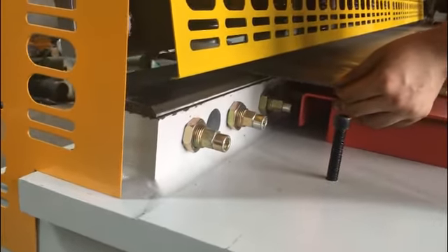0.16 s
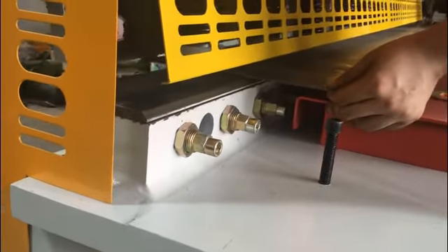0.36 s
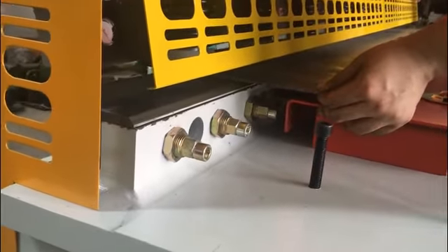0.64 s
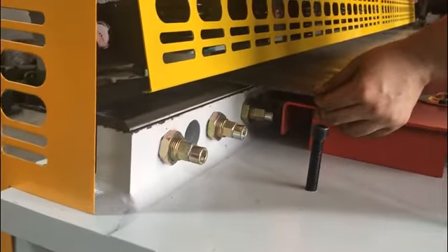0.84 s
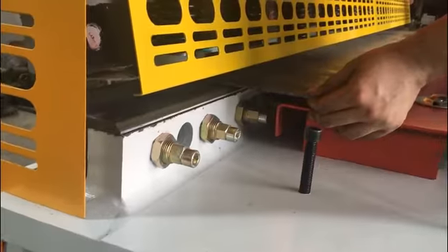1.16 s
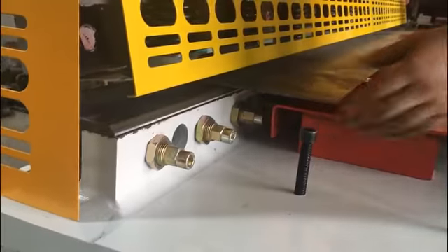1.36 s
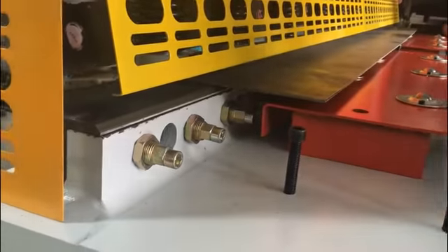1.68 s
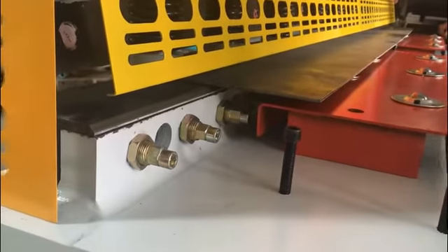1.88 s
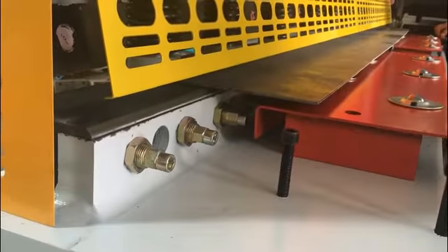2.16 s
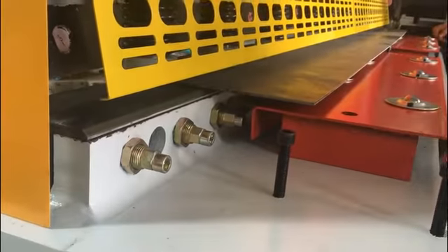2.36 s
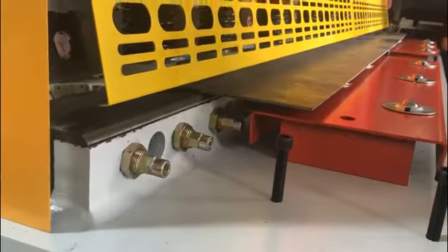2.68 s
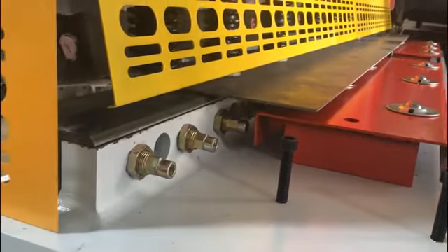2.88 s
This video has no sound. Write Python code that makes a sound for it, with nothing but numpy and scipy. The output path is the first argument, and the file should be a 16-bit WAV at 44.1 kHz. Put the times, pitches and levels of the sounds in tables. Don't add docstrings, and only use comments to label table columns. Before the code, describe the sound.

A hydraulic sheet-metal shear idles with a steady low pump hum, throbbing rapidly, with faint whine, hiss and small metallic rattles. Around 1.7 seconds a valve opens: oil rushes and rumbles, shaking the frame while loose parts chink. A sharper rattle comes at 2.6, then the pump strains louder. A dry relay click at 2.8 precedes clamps slamming in quick succession from 2.98, very loud, the steel ringing. Near mono.

```python
import sys
import numpy as np
from scipy import signal
from scipy.fft import rfft, irfft, next_fast_len
from scipy.io import wavfile
from scipy.ndimage import uniform_filter1d, map_coordinates

SR = 44100
rng = np.random.default_rng(int(sys.argv[2]) if len(sys.argv) > 2 else 0)


def dump_mix(stems):
    frames = np.atleast_2d(stems).T
    limited = np.clip(frames, -1, 1)
    pcm = np.round(limited * 32767).astype(np.int16)
    wavfile.write(sys.argv[1], SR, pcm)


def invert_db(level):
    return 10 ** (np.asarray(level, dtype=float) / 20)


N = 133623

SHAFT_HZ, ECCENTRIC_S = 24.937, 0.01082
# multiple of the shaft rate, rms level in dB, unsteadiness in dB, growth with pressure in dB per dB.
SHAFT_ORDERS = [(4, -40, -1, .5), (11, -44.5, 2, .3), (12, -32, 0, .9), (13, -29.5, 0.8, .8),
                (14, -42.5, -2, 1.1), (25, -42.5, 0, .3), (26, -30.5, -1, 1.37), (27, -45, 1.3, 1.6)]
MOST_UNSTEADY_DB = 1.3
# time in seconds, level in dB.
PRESSURE = [
    (0, 0.5),
    (.2, 0.74),
    (1.7, 0.1),
    (2.0, -1),
    (2.62, -0.1),
    (2.75, 4),
    (3.03, 6),
]
# frequency in Hz, rms level in dB.
WHINE = [(1222, -48.5), (1394, -49), (1480, -65), (1572, -60.5), (1620, -60), (1696, -55.5), (1744, -64),
         (1922, -52.5), (2116, -56.5), (2180, -57.5), (2449, -65.5), (2536, -62), (3494, -61.5)]
WHINE_DB, WHINE_UNSTEADY_DB = 0.5, 1.25
SHELL_HZ, SHELL_WIDTH_HZ = 661, 24
CASING_DB, IDLE_DB, HISS_DB = -33, -30.5, -39
# frequency in Hz, width in Hz, level in dB.
CASING = [(600, 38, -15), (679, 9, 5), (502.7, 17, -7.5), (789, 98, -9), (419.7, 26.5, -8.5)]
# frequency in Hz, density in dB per Hz.
IDLE = [(13, -45), (32, -3), (81, 2.5), (225, -9.5), (312, -2.5), (462, -14), (652, -4), (731, -5),
        (1100, -39.5), (1430, -56), (2420, -120)]
# frequency in Hz, density in dB per Hz.
HISS = [(530, -29), (900, 2.5), (1090, -7.5), (1330, -6), (1500, -7), (3620, -18), (7500, -32.5),
        (9750, -70), (16500, -120)]
# time in seconds, level in dB.
HISS_SETTLES = [(0, 2), (.18, 2.5), (.3, -0.46)]
# frequency in Hz, gain in dB.
AIR = [(4500, 1.5), (4780, 2), (4950, -6), (5150, 2.5), (5500, 5.5), (7500, 4.5), (10000, -0.5),
       (16000, -27)]

# time in seconds, level in dB.
RATTLES = [(.01, -46), (.07, -45), (.13, -43), (.16, -45), (.31, -48), (.42, -49), (.63, -48), (.96, -47),
           (1.07, -44), (1.1, -46), (1.25, -48), (1.695, -41), (1.885, -41), (1.965, -41), (2.06, -44),
           (2.095, -41), (2.165, -42), (2.29, -42), (2.42, -42), (2.455, -41), (2.545, -42), (2.608, -34),
           (2.632, -36), (2.76, -43)]
# frequency in Hz, density in dB per Hz.
RATTLE_COLOUR = [(2000, -30), (4300, -4), (6000, -4), (9000, -3), (12500, -3), (14000, -8), (15700, -5)]
RATTLE_DB, RATTLE_PATCHY_DB, RATTLE_T60, RATTLE_RISE_S = -4, 2.5, 0.11, 0.008
# time in seconds,
# level in dB, resonance in Hz.
CHINKS = [(.13, -55, 11200), (.13, -57, 12800), (.305, -57, 8600), (.625, -57, 8600), (.985, -57, 9300),
          (1.07, -54, 11500), (1.075, -57, 9800), (1.245, -57, 8600), (1.69, -53, 11700),
          (1.69, -56, 13000), (1.695, -46, 6200), (1.735, -46, 6300), (1.79, -48, 5800), (1.78, -53, 10000),
          (1.88, -50, 12300), (1.88, -53, 10800), (1.965, -55, 12800), (2.055, -53, 12300),
          (2.095, -52, 12200), (2.16, -56, 13000), (2.175, -55, 11700), (2.285, -53, 11400),
          (2.415, -51, 12400), (2.54, -53, 11400), (1.965, -53, 10800), (2.455, -55, 13000),
          (2.604, -40, 15600), (2.607, -38, 4700), (2.753, -48, 12800)]
CHINK_WIDTH_HZ, CHINK_T60 = 700, 0.13

# time in seconds, level in dB.
FLOW = [
    (1.66, -34),
    (1.71, -2.5),
    (1.8, -1),
    (2.1, 0),
    (2.45, 0),
    (2.7, -1),
    (2.9, -1.5),
    (3.03, -2),
]
RUSH_DB, RUMBLE_DB, FRAME_DB = -31, -24.5, -34
RUMBLE_GROWS = 2.1
# frequency in Hz, density in dB per Hz.
RUSH = [(470, -32), (800, 0), (1610, 1), (2780, -10), (4040, -13), (4970, -19.5), (6050, -21.5),
        (7500, -28.5), (9750, -57), (16500, -120)]
# frequency in Hz, density in dB per Hz.
RUMBLE = [(15, -31), (25, -27), (57, -0.5), (136, -2), (174, -6.5), (267, -5.5), (290, -3), (380, -41.5),
          (640, -120)]
# time in seconds, level in dB.
RUMBLE_FADES = [(1.72, -13), (1.77, -1), (2.6, -2), (2.72, -2.5), (2.95, -2.5)]
# frequency in Hz, width in Hz, level in dB.
FRAME = [(142.9, 11, .5)]
# time in seconds, level in dB.
FRAME_SHAKES = [(1.72, -26.5), (1.77, 1), (1.84, 5), (1.91, 8), (2.0, 5), (2.15, 2), (2.3, -2), (2.42, 5),
                (2.52, 3), (2.7, 3.5), (2.9, -6)]

# time in seconds, peak in dB.
RELAY = [(2.817, -5)]
# frequency in Hz, width in Hz, level in dB.
CONTACT = [(6030, 470, 3), (8800, 1300, -16), (12500, 1600, -15), (3300, 2000, -9.5), (14500, 1500, -24)]
CLICK_T60, CLICK_TAIL_DB, CLICK_TAIL_T60 = 0.0066, -29, 0.066

# time in seconds, level in dB.
CLAMPS = [
    (2.982, -2.5),
    (2.9922, -5.5),
    (2.9952, -4.5),
    (3.002, -24.5),
    (3.008, -9.5),
    (3.015, -5),
    (3.023, -12.5),
    (3.027, -9.5),
]
# frequency in Hz, width in Hz, level in dB.
SHEET = [(505, 30, -5), (585, 30, -7), (884, 27, 1), (1140, 40, 0), (1226, 40, 5), (1600, 60, 2),
         (1941, 26, -4), (2121, 26, -4), (2236, 30, -8), (2934, 26, -10), (3317, 45, -5), (4568, 33, -16),
         (5590, 28, -13), (6300, 110, -4)]
# frequency in Hz, density in dB per Hz.
CRASH = [(240, -43), (400, -4.5), (889, -6.5), (1020, -10.5), (1800, -6.5), (2170, -8.5), (2770, -10.5),
         (6250, -14.5), (15700, -35.5)]
CRASH_DB, CRASH_T60, CRASH_DULLS, BASS_LAG_S = -4.5, 0.16, 0.45, 0.0064
RING_DB, RING_SCATTER_DB, RING_RISE_S = -3.5, 1.5, 0.011
# frequency in Hz, width in Hz, level in dB.
FOOT = [(3900, 190, -6), (4420, 120, -14), (6300, 150, -18)]

SIDE_DB = -23.5
# frequency in Hz, gain in dB.
SIDE_COLOUR = [(700, -46), (1400, -7), (2500, 3.5), (6000, 15.5), (9000, 5), (15000, -0.5)]
# frequency in Hz, rms in dB.
MUTE = [(3500, -85), (4900, -67), (6000, -72.5), (7400, -66.5), (8500, -65), (12000, -63), (14000, -64),
        (16000, -56)]
# frequency in Hz, lean (in spreads of a random field).
SIDE_ODDS = [(1000, -4), (2500, -0.9), (3600, -1), (4300, 4), (5000, -2.5), (8000, -0.15), (15000, -1)]
FRAME_START, BAND_BINS, TOP_HZ = 961, 32, 15800
CLIP_LEVEL = 1.05


def unit(x):
    return x / np.sqrt(np.mean(x ** 2) + 1e-20)


def along(points, hz):
    f, v = np.transpose(points)
    return invert_db(np.interp(np.log(hz + 1), np.log(f + 1), v))


def curve(rows):
    return np.interp(np.arange(N) / SR, *np.transpose(rows))


def wobble(rate):
    knots = rng.standard_normal(int(N * rate / SR) + 4)
    return map_coordinates(knots, [np.arange(N) * rate / SR])


def filtered(x, response):
    m = next_fast_len(len(x) + 8192)
    return irfft(rfft(x, m) * response(np.fft.rfftfreq(m, 1 / SR)), m)[:len(x)]


def resonant(peaks):
    return lambda f: sum((-1) ** k * invert_db(db) * 1j * f * w / (c * c - f * f + 1j * f * w + 1e-9)
                         for k, (c, w, db) in enumerate(peaks))


def smooth_field(shape, across, onward):
    field = uniform_filter1d(rng.standard_normal(shape), size=across, axis=0)
    return unit(uniform_filter1d(field, size=onward, axis=1))


def rush(response, patchy_db):
    z = signal.stft(rng.standard_normal(N), nperseg=512)[2]
    z = z * invert_db(patchy_db * smooth_field(z.shape, 8, 8))
    return unit(filtered(signal.istft(z, nperseg=512)[1][:N], response))


def pump():
    turn = 2 * np.pi * SHAFT_HZ * (np.arange(N) / SR - ECCENTRIC_S)
    pressure_db = curve(PRESSURE)
    tones = np.zeros(N)
    for order, db, unsteady, grows in SHAFT_ORDERS:
        unsteady = min(unsteady, MOST_UNSTEADY_DB)
        level = invert_db(db + grows * pressure_db + unsteady * wobble(21.76))
        tones += level * np.sqrt(2) * np.cos(round(order) * turn + 0.096 * unsteady * wobble(17))
    shell = resonant([(SHELL_HZ, SHELL_WIDTH_HZ, 0)])
    tones = filtered(tones, lambda f: 1 - 2 * shell(f))

    whine = np.zeros(N)
    for hz, db in WHINE:
        level = invert_db(db + WHINE_DB + WHINE_UNSTEADY_DB * wobble(5))
        whine += level * np.sqrt(2) * np.sin(hz / SHAFT_HZ * turn + 0.2 * wobble(4))

    casing = rush(lambda f: resonant(CASING)(f) * along([(900, 3.0), (1500, -1.5)], f), patchy_db=1.8)
    casing *= invert_db(CASING_DB + 0.97 * pressure_db)
    body = invert_db(IDLE_DB + 0.85 * wobble(1.8)) * rush(lambda f: along(IDLE, f), patchy_db=0.5)
    hiss_db = HISS_DB + curve(HISS_SETTLES) + 0.4 * wobble(3.6) + 0.51 * np.cos(turn)
    hiss_colour = [(500, -45.0)] + HISS[1:-2]
    hiss = invert_db(hiss_db) * rush(lambda f: along(hiss_colour, f) * along(AIR, f), patchy_db=0.74)
    return tones + whine + casing + body + hiss


def rattles():
    t = np.arange(N) / SR
    shape = np.zeros(N)
    for s, db in RATTLES:
        rise = np.clip((t - s) / RATTLE_RISE_S + 0.5, 0, 1)
        shape += invert_db(db + RATTLE_DB - 60 * np.abs(t - s) / RATTLE_T60) * rise
    return shape * rush(lambda f: along(RATTLE_COLOUR, f), patchy_db=RATTLE_PATCHY_DB)


def chinks():
    out, t = np.zeros(N + 4096), np.arange(4096) / SR
    for s, db, hz in CHINKS:
        part = resonant([(hz, CHINK_WIDTH_HZ, 0)])
        noise = unit(filtered(rng.standard_normal(len(t)), lambda f: part(f) ** 2))
        fade = invert_db(db - 60 * t / CHINK_T60) * np.clip(t / RATTLE_RISE_S, 0, 1)
        out[round(s * SR):][:len(t)] += fade * noise
    return out[:N]


def oil():
    flow_db = curve(FLOW)
    rumble = invert_db(RUMBLE_DB + 0.34 * wobble(8.2)) * rush(lambda f: along(RUMBLE, f), patchy_db=1.0)
    rumble *= invert_db(RUMBLE_GROWS * flow_db + curve(RUMBLE_FADES))
    frame = invert_db(FRAME_DB) * rush(lambda f: resonant(FRAME)(f) ** 2, patchy_db=-4.0)
    frame *= invert_db(curve(FRAME_SHAKES))
    colour = [(250, -1.3), (500, -1.5)] + RUSH[1:-2]
    hiss = invert_db(RUSH_DB + 0.42 * wobble(12)) * rush(lambda f: along(colour, f) * along(AIR, f), patchy_db=1.75)
    return invert_db(flow_db) * hiss + rumble + frame


def relay():
    t = np.arange(N) / SR
    shape = np.zeros(N)
    for s, db in RELAY:
        since = np.abs(t - s)
        fade = invert_db(-60 * since / CLICK_T60) + invert_db(CLICK_TAIL_DB - 60 * since / CLICK_TAIL_T60)
        shape += invert_db(db) * np.clip((t - s) / 0.002, 0, 1) * fade
    tilt = [(1200, -23.5), (2200, -6), (4000, -6.5), (13000, -0.5), (15500, -10)]  # Hz, dB
    return shape * rush(lambda f: resonant(CONTACT)(f) * along(tilt, f), patchy_db=1)


def clamp_crash(length):
    hz, tt, z = signal.stft(rng.standard_normal(length), SR, nperseg=128)
    high = np.maximum(hz, 300)[:, None] / 2000
    decay = invert_db(-60 * tt / (CRASH_T60 * high ** -CRASH_DULLS))
    rise = 1 - np.exp(-(tt + 0.00055) * high ** 3 / BASS_LAG_S)
    crash = signal.istft(z * decay * rise, SR, nperseg=128)[1][:length]
    colour_rms = np.sqrt(np.mean(along(CRASH, np.linspace(0, SR / 2, num=500)) ** 2))
    return filtered(crash, lambda f: along(CRASH, f)) / colour_rms


def sheet_ring(t, s, phases):
    ring = np.zeros(len(t))
    for (hz, width, db), phase in zip(SHEET, phases):
        level = invert_db(db + rng.normal(0, RING_SCATTER_DB))
        tone = np.sin(2 * np.pi * hz * (t + s) + phase + rng.normal(0, 1.0))
        rise = 1 - np.exp(-t * hz / 2000 / RING_RISE_S)
        ring += level * np.exp(-np.pi * width * t) * tone * rise
    return ring


def clamps():
    out, t = np.zeros(N + 8192), np.arange(8192) / SR
    phases = rng.uniform(0, 2 * np.pi, len(SHEET))
    for s, db in CLAMPS:
        crash = clamp_crash(len(t)) * (1 - np.exp(-t / 0.0018))
        blow = invert_db(CRASH_DB) * crash + invert_db(RING_DB) * sheet_ring(t, s, phases)
        start = round(s * SR)
        out[start:][:len(t)] += invert_db(db) * blow[:len(out) - start]
    return out[:N]


def foot():
    t = np.maximum(np.arange(N) / SR - CLAMPS[0][0] - 0.0006, 0)
    ping = sum(invert_db(db) * np.exp(-np.pi * w * t) * np.sin(2 * np.pi * hz * t) for hz, w, db in FOOT)
    return ping * (1 - np.exp(-t / 0.00027))


def scene():
    mid = pump() + rattles() + chinks() + oil() + relay() + clamps() + foot()
    scatter = rng.standard_normal(600)
    side = signal.fftconvolve(mid, scatter / np.linalg.norm(scatter))[:N]
    side = invert_db(SIDE_DB) * filtered(side, lambda f: along(SIDE_COLOUR, f))
    return np.array([mid + side, mid - side])


def gate_bands(pair):
    pad = 1024 - FRAME_START
    mid_side = np.array([pair[0] + pair[1], pair[0] - pair[1]]) / 2
    hz, _, z = signal.stft(np.pad(mid_side, ((0, 0), (pad, 0))), SR, "cosine", 2048)
    band = np.minimum(np.arange(len(hz)) // BAND_BINS, 31)
    centre = (np.arange(32) + 0.5) * BAND_BINS * hz[1]
    power = 1.6 * np.add.reduceat(np.abs(z[0, :-1]) ** 2, np.arange(32) * BAND_BINS)
    judged = power * invert_db(2 * rng.standard_normal(power.shape))
    loud = (judged > along(MUTE, centre)[:, None] ** 2) & (centre < TOP_HZ)[:, None]
    lean = 20 * np.log10(along(SIDE_ODDS, centre))[:, None]
    wide = smooth_field(power.shape, 2, 3) + lean > 0
    wide &= power.sum(axis=0) < invert_db(-26)
    z = z * [loud[band], (loud & wide)[band]]
    mid, side = signal.istft(z, SR, "cosine", 2048)[1][:, pad:pad + N]
    return np.array([mid + side, mid - side])


def roll_off(x):
    return signal.sosfilt(signal.butter(12, 15840, fs=SR, output="sos"), x)


def record(dry):
    clipped = dry / (1 + np.abs(dry / CLIP_LEVEL) ** 6) ** (1 / 6)
    return roll_off(gate_bands(clipped))


dry = scene()
out = record(dry)
dump_mix(out)
```